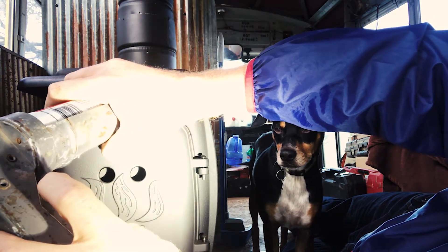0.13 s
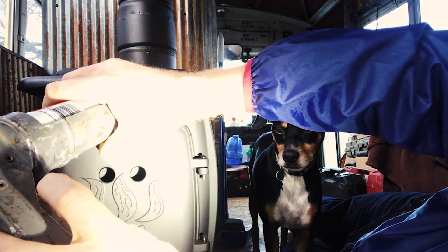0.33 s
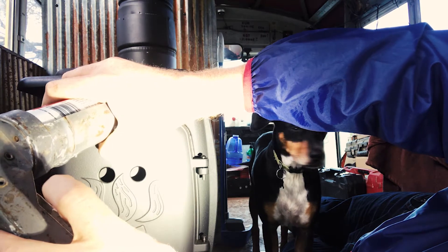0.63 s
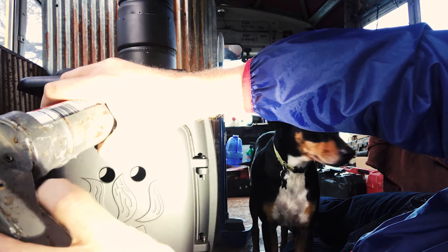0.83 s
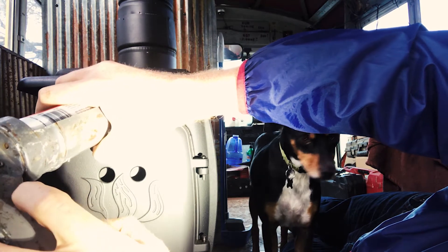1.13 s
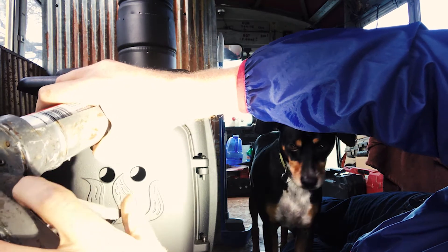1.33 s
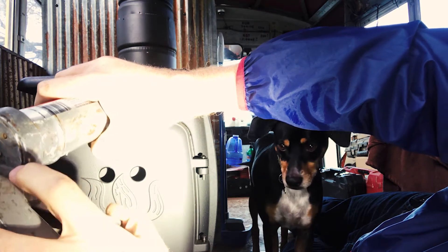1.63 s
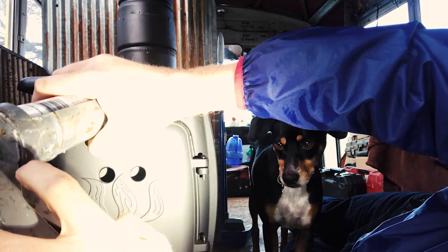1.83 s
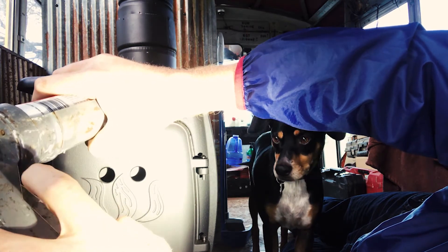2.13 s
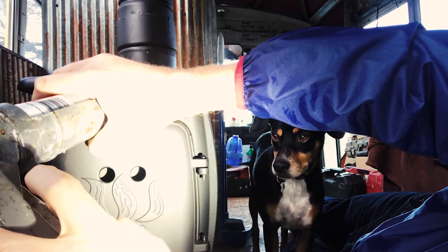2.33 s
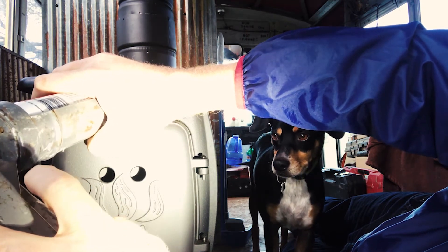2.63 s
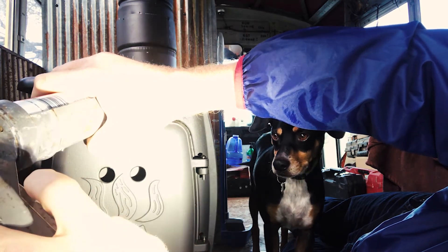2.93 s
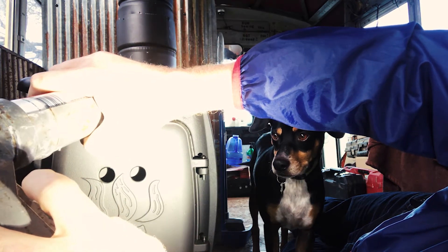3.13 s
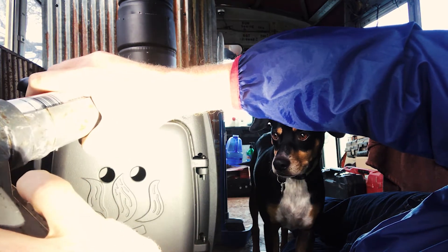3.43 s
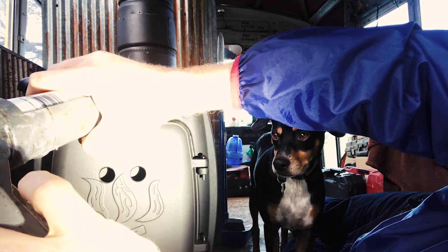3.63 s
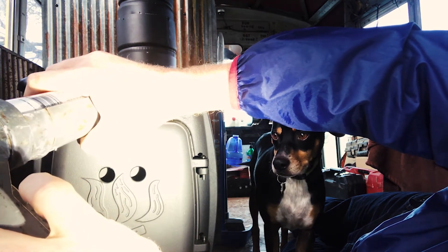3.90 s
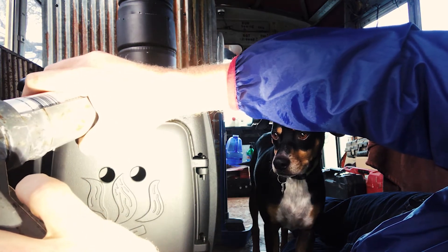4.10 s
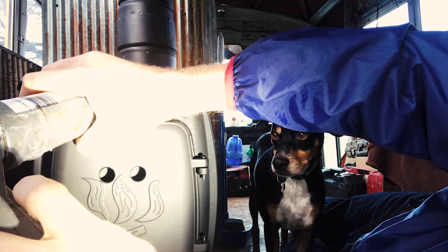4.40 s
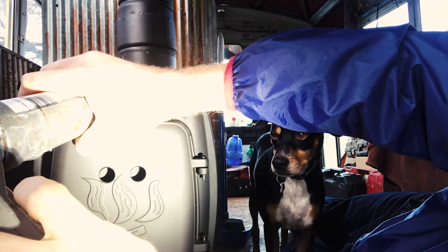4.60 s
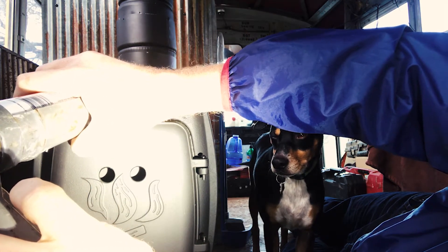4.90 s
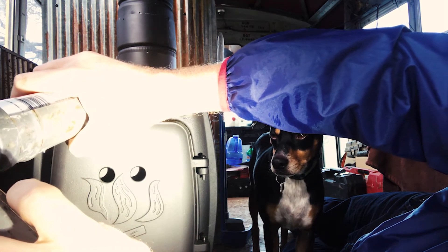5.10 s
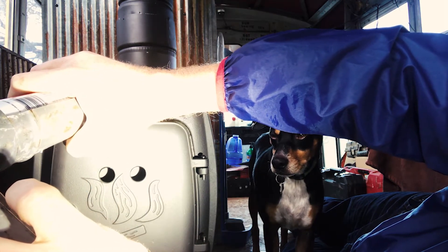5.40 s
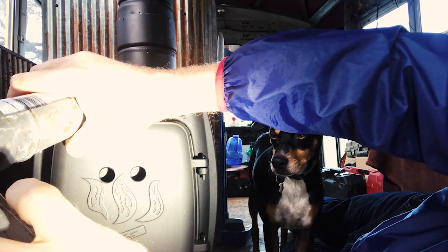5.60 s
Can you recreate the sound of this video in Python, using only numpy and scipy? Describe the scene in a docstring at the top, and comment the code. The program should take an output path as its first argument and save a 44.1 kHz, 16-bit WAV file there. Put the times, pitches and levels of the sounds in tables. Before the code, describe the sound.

Very close microphone in a small, quiet, hard-walled bus cabin. A hand works a metal caulking gun: light ticks and quickening rod slips, a bright rasping squeak, then a loud clack. After a brief rub, a second equally loud clack with a short reverberant tail. Sparse faint ticks and thin spring rings follow, ending with one firmer tick.

```python
"""In a small, quiet, hard-walled cabin a hand works the trigger of a steel caulking gun.
The rod slips, the grip plate ticks, the trigger rubs and clacks against two stops: modal resonators
driven by contact forces and friction noise, with band-shaped noise for each contact itself.
The return spring rings as one thin mode, the cabin adds a diffuse decaying tail, and soft low tones swell.
Sliding sleeve and hand, low rumble and smooth hiss are coloured noise."""
import sys
import numpy as np
from scipy import signal
from scipy.io import wavfile
from scipy.ndimage import uniform_filter1d, minimum_filter1d

SR = 44100
rng = np.random.default_rng(int(sys.argv[2]) if len(sys.argv) > 2 else 0)


def undo_db(level):
    """Turn decibels back into plain size, where 20 dB means ten times bigger."""
    steps = np.asarray(level, float) / 20
    return 10 ** steps


def file_out(sig):
    """Save sig as 16-bit WAV at sys.argv[1]."""
    # one column per channel
    cols = np.atleast_2d(sig).T
    # limit, then scale
    lim = np.clip(cols, -1, 1)
    pcm = np.round(lim * 32767).astype(np.int16)
    wavfile.write(sys.argv[1], SR, pcm)


N = 253575

# Background spectrum. Each row: frequency in Hz, relative density in dB per Hz.
AIR_SPECTRUM = [(12, -42), (20, -13.5), (49, -1.5), (102, -1.5), (184, -11.5), (351, -9.5), (393, -13.5),
                (939, -17), (1510, -21), (2060, -19), (2810, -26.5), (3620, -25), (4930, -27), (15200, -38),
                (16500, -46.5)]
AIR_RMS_DB = -66

# Sliding sleeve and hand. Each row: start in seconds, length in seconds, rms in dB at start, at end;
# the resting level is the floor.
RUSTLE_STROKES = [(0, .15, -72, -73), (.9, 0.27, -75, -66.5), (1.13, 0.048, -64.5, -60.5),
                  (1.2, 0.22, -66, -70.5), (1.55, .37, -62, -62.5), (2.05, 0.36, -62.5, -63.5),
                  (2.9, 0.302, -70, -71), (4.0, 0.18, -79, -71), (4.75, .45, -76.5, -73.5)]
# Colour of that sliding. Each row: frequency in Hz, relative density in dB per Hz.
RUSTLE_SPECTRUM = [(300, -14), (1000, -2), (2200, -0.5), (4500, -4.5), (9000, -10.5), (16000, -14.5)]
RUSTLE_START_S, RUSTLE_STOP_S, RUSTLE_REST_DB = 0.1, 0.014, -77.5

# Modes of the gun. Each row: frequency in Hz, undamped decay time T60 in seconds,
# then relative level in dB when struck at the rod, grip plate, front stop, back stop.
GUN_MODES = [(325, 0.098, -51.5, -29, -54.5, -40), (560, 0.13, -44.5, -24.5, -56, -41.5),
             (890, 0.035, -33.5, -14, -32.5, -6.5), (1380, .04, -21, -44, -30, -21.5),
             (1464.5, .08, -1, -33, -27.5, -13.5), (1560, 0.078, -13, -34, -32.5, -19),
             (1810, 0.059, -22, -22, -26, -9), (2140, 0.15, -15, -6, -40.5, -30.5),
             (2226, 0.035, -7.5, -26, -19, -18.5), (2438, 0.061, -13, -1, -1, -9),
             (2659, .04, -11, -16, -3, -10), (2870, 0.044, -20.5, -41, -11.5, -16),
             (3017, 0.058, -20, -34, -23, -10), (3143, .035, -14.5, -43, -9, -12.5),
             (3140, 0.035, -16, 1, -26.5, -29), (3904, .04, -25.5, -16, -25.5, -15.5),
             (4100, 0.11, -27.5, -8, -27, -25), (4430, 0.018, -27.5, -24.5, -8, -20),
             (4950, .04, -35, -64, -33, -28), (4880, 0.021, -31.5, -28, -30.5, -28.5),
             (5235, .045, -36.5, -38, -25.5, -10.5), (6200, .04, -37, -14, -19.5, -25.5),
             (7100, 0.064, -34, -0.5, -24.5, -26.5), (8680, .04, -44.5, -17, -21.5, -19.5),
             (9480, 0.083, -44.5, -9.5, -35, -29), (10800, .03, -49, -25, -41, -28),
             (11960, .03, -53.5, -0.5, -27.5, -25.5), (12600, 0.034, -45.5, -36, -38.5, -28),
             (14500, .02, -51, -49, -36, -26.5)]
# Noise of the contact itself. Each row: frequency in Hz,
# then relative level in dB at the rod, grip plate, front stop, back stop, dry snap.
CONTACT_SPECTRUM = [(296, -40, -40, -38, -42.5, -60.5), (600.2, -31.5, -32, -26, -26, -60),
                    (1000, -21.5, -14, -24, -8, -60.5), (1620, -11.5, -2, -26, -16, -55),
                    (1920, -14, -9.5, -21, -8, -51), (2260, -11.5, -2.5, -1, -12, -44),
                    (2900, -11.5, -7.5, -6, -11.5, -37.5), (3620, -17, -7.5, -11.5, -12, -24.5),
                    (5830, -25, -9, -14.5, -17.5, -4), (8000, -32, -9.5, -21, -13, -10),
                    (12000, -45.5, -10.5, -28, -23, -12), (16000, -51, -11, -30.5, -29.5, -11.5)]
# Slips of the rod on soft or hard spots. Each row: time in seconds, strength in dB,
# hardness as spectral tilt in dB per octave about 2 kHz.
ROD_SLIPS = [(0.7623, -47.5, -3), (0.784, -42.5, -2.5), (0.8021, -45, 3.5), (0.8164, -42.5, -1),
             (0.831, -42, 2), (0.8686, -39.5, 1), (0.9014, -39, -1), (0.9388, -37, -1), (1.0323, -35, -1.5),
             (1.2096, -35.5, -6), (1.4025, -44.5, -3), (1.4275, -46.5, 0), (2.2423, -34, 8.5),
             (2.3115, -43.5, 4.5), (2.3412, -36, 5.5), (2.4088, -52, 1.5), (2.4294, -51, 2),
             (2.4778, -52, -6.5), (2.4976, -55, 3), (2.5216, -52, -5), (2.585, -45, 3), (2.6085, -47, -3),
             (2.6219, -48, 4.5), (2.6398, -51, -6), (2.651, -46.5, -1.5), (2.7706, -41, -0.5),
             (2.8913, -42.5, 6.5), (2.9617, -44.5, -2), (3.3616, -39.5, 6), (3.4933, -42.5, 0),
             (3.5189, -45, -1.5), (3.5625, -50.5, -2.5), (3.6239, -44.5, -0.5), (3.6621, -41.5, -0.5),
             (3.692, -44.5, 0.5), (3.736, -41.5, 0.5), (3.8238, -39, -0.5), (3.856, -41, -1.5),
             (3.8995, -39, 0), (5.6364, -25, 1.5)]
# The other contacts. Each row: time in seconds, strength in dB.
PLATE_TICKS = [(0.4864, -52), (0.4978, -40.5), (0.5375, -39.5), (0.6441, -40), (1.2085, -38), (2.1967, -34),
               (2.8684, -37), (3.217, -39.5), (3.256, -51), (3.3251, -41), (3.4315, -43.5), (4.372, -46),
               (4.5684, -54)]
FRONT_STOP_HITS = [(1.5065, -23), (1.5124, -5), (1.5171, -10), (1.803, -51.5), (1.839, -45)]
BACK_STOP_HITS = [(1.975, -47), (1.982, -4.5), (1.9872, -15.5), (2.241, -42), (2.312, -48.5), (2.342, -52)]
DRY_SNAPS = [(1.121, -60), (1.1426, -34.5), (1.2327, -60), (1.279, -41.5), (1.484, -63), (2.9969, -65),
             (3.089, -66.5), (4.8392, -59.5)]
# Hardness against strength, at plate, front stop, back stop, dry snap.
# Each row: tilt in dB per octave of a -40 dB contact, added tilt in dB per octave per dB.
HARDNESS = [(-0.58, 0.12), (-0.6, 0.055), (-4.5, 0.0814), (-0.83, -0.06)]
# Contact at rod, plate, front stop, back stop, dry snap (which drives no modes).
# Each row: contact time in seconds at 2 kHz, exponent of its growth toward low modes, ring gain in dB,
# share of the undamped T60 left under the hand, noise gain in dB, noise decay constant in seconds.
TOUCH = [(0.0026, 2.1, 1, 0.77, -5.5, .005), (0.00074, 0.3, -6, 0.55, -7.5, 0.0046),
         (0.0014, 0.54, 6.5, .45, 1.5, 0.002), (0.0015, 0.21, 9, 0.59, 6.5, 0.0029),
         (.001, .4, -99, .5, 4.5, 0.0017)]
BURST = SR // 25  # samples in one contact
CRACK_RISE_S, BASS_CUT_HZ = 0.00027, 240

# Strokes of the rubbing trigger. Each row: start in seconds, length in seconds,
# strength in dB at start, at end, place from 0 at the rod to 1 at the front stop.
RUB_STROKES = [(1.218, .075, -57, -51, 0.016), (1.291, .025, -51, -46.5, .12),
               (1.444, 0.028, -54, -48, 0.21), (1.476, 0.042, -51, -34.5, 0.2),
               (1.802, 0.026, -47.5, -52.5, 0.3), (1.843, 0.033, -46, -38, 0.71),
               (1.889, 0.067, -47.5, -60.5, 0.17), (1.96, 0.025, -36.5, -46, .55),
               (2.2, 0.0186, -37.5, -40, 0.48), (2.216, 0.17, -62.5, -57.5, 0.3),
               (2.584, 0.1, -57.5, -59, 0.203), (3.261, 0.12, -58.5, -60, .4)]
RUB_START_S, RUB_STOP_S = 0.004, 0.015
RUB_HISS_DB, RUB_GRAIN_DB = -11, 3.5
# tilt in dB per octave at the rod and toward the stop; share of the way over which it relaxes
RUB_TILT_ROD_DB, RUB_TILT_STOP_DB, RUB_TILT_REACH = 7.5, -3, 0.088
RUB_TOP_HZ = 6533  # the tilt grows no further above this
# near the rod the rubbing rasps: it also drives the modes around this pitch
RASP_DB, RASP_HZ, RASP_OCTAVES = -9, 5200, 0.45

# Decay of the cabin. Each row: frequency in Hz, T60 in seconds.
CABIN_T60 = [(200, 0.29), (900, 0.24), (2500, 0.31), (5000, .25), (10000, 0.18)]
CABIN_RING_DB, CABIN_CRACK_DB, CABIN_GAP_S = -21, -12.5, 0.0022

# Plucks of the return spring. Each row: time in seconds, level in dB.
SPRING_PLUCKS = [(1.312, -56), (2.255, -62), (2.41, -59), (2.655, -55), (2.775, -60), (3.902, -62),
                 (4.1, -68.5), (4.375, -64.5), (4.57, -71), (4.87, -68), (5.13, -68.5), (5.645, -51)]
SPRING_HZ, SPRING_T60_S = 2142, 0.3

# Soft low tones around the second clack. Each row: start in seconds, frequency in Hz,
# peak in dB, time to the peak in seconds.
LOW_TONES = [(1.86, 560, -59, .045), (2.01, 150, -55.5, 0.04), (2.016, 353.5, -58.5, 0.033)]

LOWPASS_HZ, LIMITER_S = 16900, 0.002


def rms_one(x):
    """Division by the root mean square gives unit power."""
    return x / np.sqrt(np.mean(x ** 2) + 1e-20)


def at_hz(table, hz, axis=1):
    """A spectrum is interpolated linearly in dB (or seconds) over log frequency."""
    table = np.array(table, float)
    return np.interp(np.log(hz), np.log(table[:, 0]), table[:, axis])


def bands():
    """Third-octave band-passes divide the spectrum: pairs of centre in Hz and filter."""
    edges = 22 * 2 ** (np.arange(30) / 3)
    return [(np.sqrt(low * high), signal.butter(2, [low, high], "band", fs=SR, output="sos"))
            for low, high in zip(edges, edges[1:])]


def coloured(spectrum):
    """Weighted bands of white noise sum to a given spectrum; neighbouring bands are independent."""
    settle = SR // 4
    white = rng.standard_normal((2, N + settle))
    mix = sum(undo_db(at_hz(spectrum, hz)) * signal.sosfilt(sos, white[k % 2])
              for k, (hz, sos) in enumerate(bands()))
    return rms_one(mix[settle:])


def air():
    """Stationary coloured noise forms the low rumble from outside and the smooth hiss."""
    return undo_db(AIR_RMS_DB) * coloured(AIR_SPECTRUM)


def strokes(rows, start_s, stop_s):
    """A stroke sets in, presses and lets go, linearly in dB: the highest level and its stroke's index."""
    t = np.arange(N) / SR
    levels_db = np.array([np.interp(t, [s - start_s, s, s + length, s + length + stop_s],
                                    [-120, first_db, last_db, -120])
                          for s, length, first_db, last_db, *_ in rows])
    return levels_db.max(axis=0), levels_db.argmax(axis=0)


def rustle():
    """Sliding friction of cloth and skin is coloured noise under a stroke envelope, faint at rest."""
    level_db, _ = strokes(RUSTLE_STROKES, RUSTLE_START_S, RUSTLE_STOP_S)
    return undo_db(np.maximum(level_db, RUSTLE_REST_DB)) * coloured(RUSTLE_SPECTRUM)


def ring(force, hz, t60):
    """A two-pole resonator answers a unit impulse with a decaying sine of initial height 1."""
    r, w = undo_db(-60 / (t60 * SR)), 2 * np.pi * hz / SR
    return signal.lfilter([0, np.sin(w)], [1, -2 * r * np.cos(w), r * r], force + 1e-18)


def swell(touch_s, size=BURST):
    """A contact force rises to 1 at the contact time and fades within a few more."""
    t = np.arange(size) / SR / touch_s
    return t * np.exp(1 - t)


def harden(contacts, tilt_db, tilt_db_per_db):
    """The spectral tilt of a contact is linear in its strength."""
    return [(s, db, tilt_db + tilt_db_per_db * (db + 40)) for s, db in contacts]


def add(out, contacts, hz, level_db, bursts):
    """Contact forces superpose; a hard contact favours the treble."""
    for (s, strength_db, tilt_db), burst in zip(contacts, bursts):
        at = round(s * SR)
        gain_db = strength_db + level_db + tilt_db * np.log2(hz / 2000)
        out[at:at + len(burst)] += undo_db(gain_db) * burst


def rub_controls():
    """Friction proceeds in uneven grains: its level in dB, its place and its nearness to the rod."""
    level_db, stroke = strokes(RUB_STROKES, RUB_START_S, RUB_STOP_S)
    place = np.clip(np.array(RUB_STROKES)[stroke, -1], 0, 1)
    grains = rms_one(signal.lfilter([1], [1, -0.98], rng.standard_normal(N)))
    return level_db + RUB_GRAIN_DB * grains, place, np.exp(-place / RUB_TILT_REACH)


def rub_tilt(near_rod, hz):
    """Friction brightens toward the rod: spectral gain in dB at one frequency."""
    per_octave = RUB_TILT_STOP_DB + (RUB_TILT_ROD_DB - RUB_TILT_STOP_DB) * near_rod
    return per_octave * np.log2(min(hz, RUB_TOP_HZ) / 2000)


def gun_modes(places, grit, rub_db, place, near_rod):
    """Modal superposition: each mode rings under friction noise and under short contact forces."""
    rings = np.zeros(N)
    chance = [rng.random((len(p), 2, len(GUN_MODES))) for p in places]
    for m, (hz, t60, *levels_db) in enumerate(GUN_MODES):
        colour_db = levels_db[0] + place * (levels_db[2] - levels_db[0]) + rub_tilt(near_rod, hz)
        rasp_db = RASP_DB - 6.9 * (np.log2(hz / RASP_HZ) / RASP_OCTAVES) ** 2
        drive = undo_db(colour_db) + undo_db(rasp_db) * near_rod
        # rubbing is a steady force: long rings gather more of it
        friction = grit * undo_db(rub_db) * drive / np.sqrt(t60 * SR / 14)
        rings += ring(friction, hz, 0.69 * t60)
        for k, level_db in enumerate(levels_db):
            touch_s, slowness, ring_db, free = TOUCH[k][:4]
            # low modes are slower to start
            push = swell(min(touch_s * (2000 / hz) ** slowness, 0.005)) ** 2
            phase = 2 * np.pi * (hz * np.arange(len(push)) / SR + chance[k][:, :1, m])
            strength = undo_db(7.8 * (chance[k][:, 1:, m] - 1.0))  # 0 to 7.8 dB down by chance
            force = np.zeros(N)
            add(force, places[k], hz, level_db + ring_db, strength * np.cos(phase) * push * 2 / push.sum())
            rings += ring(force, hz, free * t60)
    return rings


def contact_noise(places, grit, rub_db, place, near_rod):
    """Broadband contact noise, band by band: cracks, and clicks of equal energy to excite the walls."""
    out, t = np.zeros((2, N)), np.arange(BURST) / SR
    noise = [rng.standard_normal((len(p), BURST)) for p in places]
    for band, (hz, sos) in enumerate(bands()[9:]):  # from 176 Hz up
        rod_db, stop_db = at_hz(CONTACT_SPECTRUM, hz, axis=1), at_hz(CONTACT_SPECTRUM, hz, axis=3)
        colour_db = rod_db * (1 - place) + stop_db * place + rub_tilt(near_rod, hz)
        crack = grit * undo_db(rub_db + RUB_HISS_DB + colour_db)
        click = crack.copy()
        for k, contacts in enumerate(places):
            gain_db, decay_s = TOUCH[k][4:]
            level_db = at_hz(CONTACT_SPECTRUM, hz, axis=k + 1) + gain_db + 10
            envelope = (1 - np.exp(-t / CRACK_RISE_S)) * np.exp(-t / decay_s)
            add(crack, contacts, hz, level_db, noise[k] * envelope)
            add(click, contacts, hz, level_db, np.full((len(contacts), 1), np.sqrt(decay_s * SR / 2)))
        # alternate signs join the bands without gaps
        out += (-1) ** band * signal.sosfilt(sos, np.array([crack, click]) + 1e-18)
    return out


def gun():
    """Contacts and friction excite modes and broadband noise; a high-pass keeps the gun free of deep bass."""
    others = [PLATE_TICKS, FRONT_STOP_HITS, BACK_STOP_HITS, DRY_SNAPS]
    places = [ROD_SLIPS] + [harden(contacts, *row) for contacts, row in zip(others, HARDNESS)]
    rubbing = rub_controls()
    grit = rng.standard_normal(N)
    rings = gun_modes(places, grit, *rubbing)
    cracks, clicks = contact_noise(places, grit, *rubbing)
    bass_cut = signal.butter(4, BASS_CUT_HZ, "high", fs=SR, output="sos")
    return signal.sosfilt(bass_cut, np.array([rings, cracks, clicks]))


def cabin(rings, clicks):
    """A diffuse field is convolution with noise decaying band by band; the walls get less ring than click."""
    t = np.arange(SR // 2) / SR
    tail = sum(signal.sosfilt(sos, rng.standard_normal(len(t))) * undo_db(-60 * t / at_hz(CABIN_T60, hz))
               for hz, sos in bands())
    tail = tail * np.clip(t / CABIN_GAP_S, 0, 1) ** 2
    sent = undo_db(CABIN_RING_DB) * rings + undo_db(CABIN_CRACK_DB) * clicks
    return signal.fftconvolve(sent, tail / np.sqrt(np.sum(tail ** 2)))[:N]


def spring():
    """A lightly damped single mode: each pluck of the return spring gives one thin, long ring."""
    force, push = np.zeros(N), swell(0.0025)
    pluck = np.cos(2 * np.pi * SPRING_HZ * np.arange(BURST) / SR) * push * 2 / push.sum()
    for s, level_db in SPRING_PLUCKS:
        force[round(s * SR):][:BURST] += undo_db(level_db) * pluck
    return ring(force, SPRING_HZ, SPRING_T60_S)


def low_tones():
    """Amplitude modulation of a sine by one smooth pulse: each low tone swells and fades once."""
    out, t = np.zeros(N), np.arange(SR // 4) / SR
    for s, hz, peak_db, swell_s in LOW_TONES:
        tone = np.sin(2 * np.pi * hz * t) * swell(swell_s, size=len(t)) ** 2
        out[round(s * SR):][:len(t)] += undo_db(peak_db) * tone
    return out


def scene():
    """Linear superposition of the gun close by, its reverberation, the spring, tones, hand and air."""
    rings, cracks, clicks = gun()
    direct = rings + cracks + spring()
    return (direct + cabin(rings, clicks) + low_tones() + rustle() + air())[None]


def top_cut(x):
    """Nothing passes above the cut-off."""
    return signal.sosfilt(signal.butter(12, 16750, fs=SR, output="sos"), x)


def record(dry):
    """A low-pass bounds the spectrum and a smoothed-gain limiter holds the peaks at full scale."""
    x = signal.sosfilt(signal.cheby2(10, 30, LOWPASS_HZ, fs=SR, output="sos"), dry)
    span = round(LIMITER_S * SR)
    needed = 1 / np.maximum(np.abs(x), 1)
    gain = uniform_filter1d(minimum_filter1d(needed, size=2 * span + 1), size=span)
    return top_cut(x * gain)


dry = scene()
out = record(dry)
file_out(out)
```